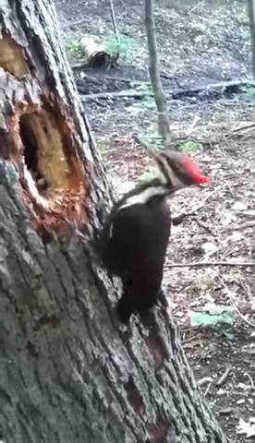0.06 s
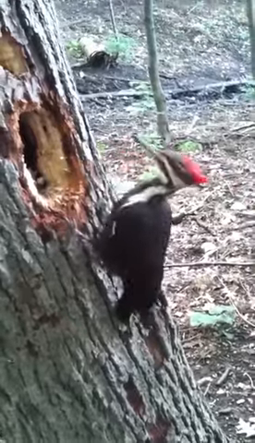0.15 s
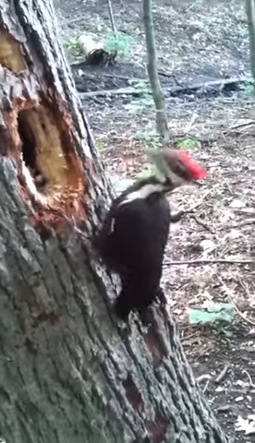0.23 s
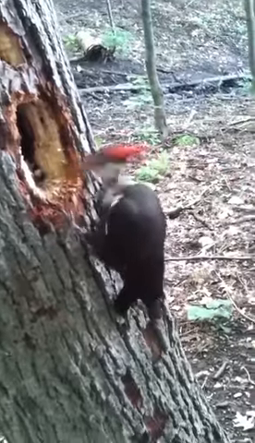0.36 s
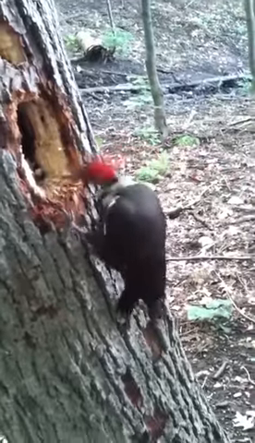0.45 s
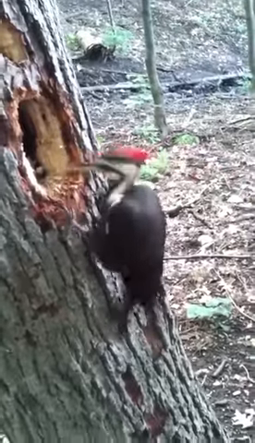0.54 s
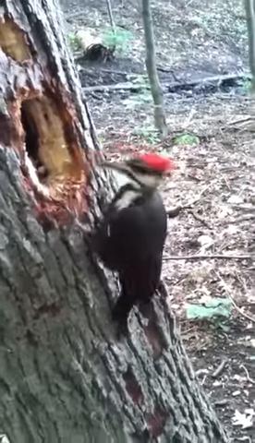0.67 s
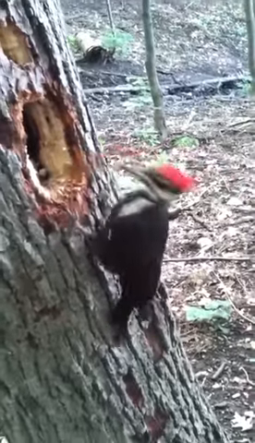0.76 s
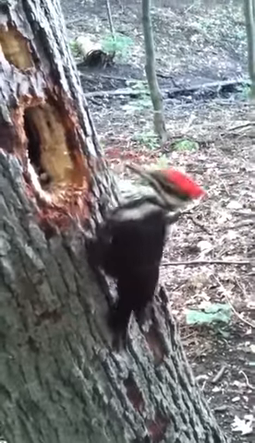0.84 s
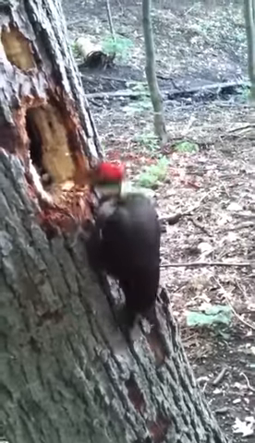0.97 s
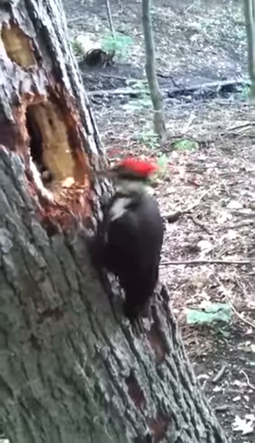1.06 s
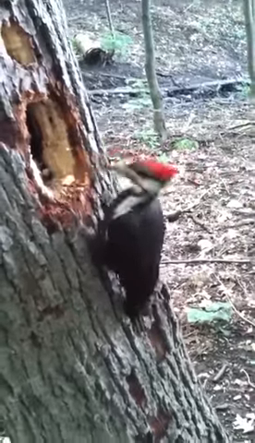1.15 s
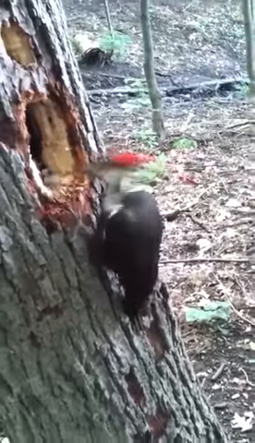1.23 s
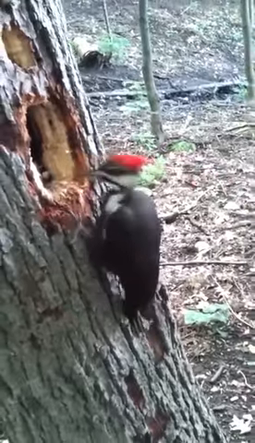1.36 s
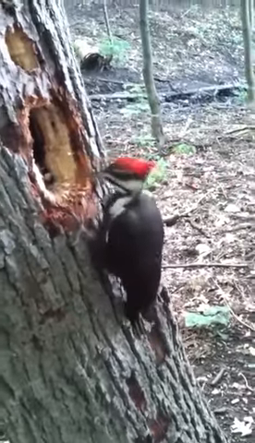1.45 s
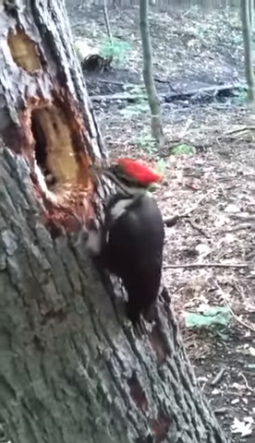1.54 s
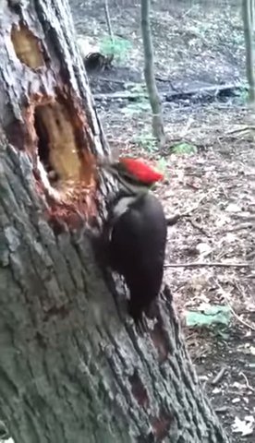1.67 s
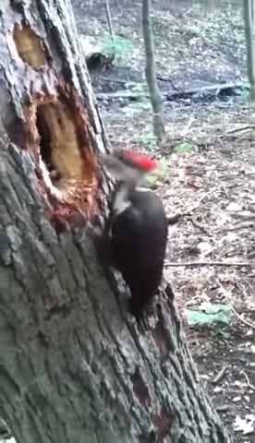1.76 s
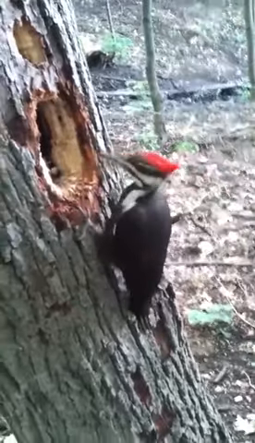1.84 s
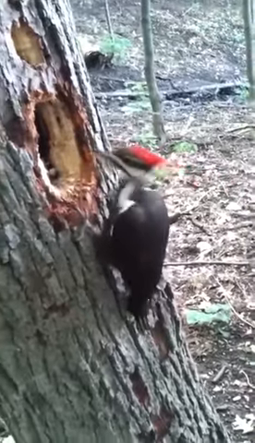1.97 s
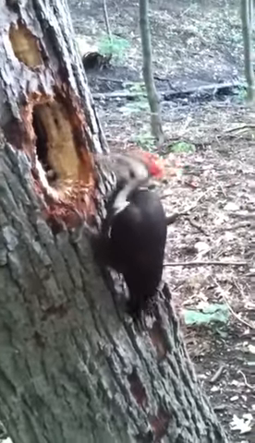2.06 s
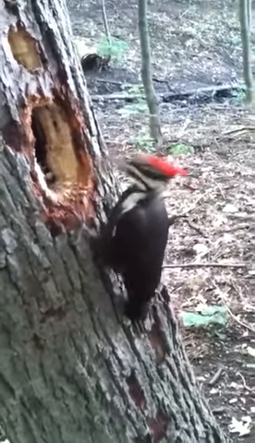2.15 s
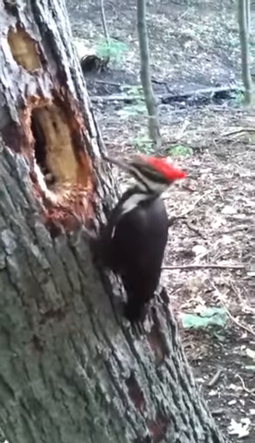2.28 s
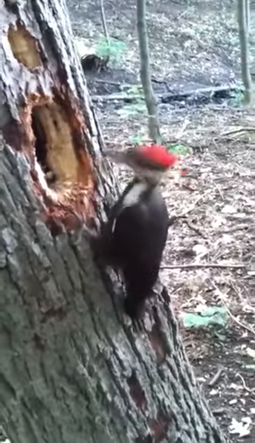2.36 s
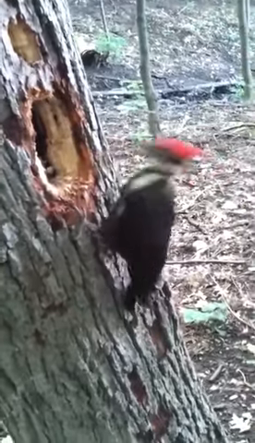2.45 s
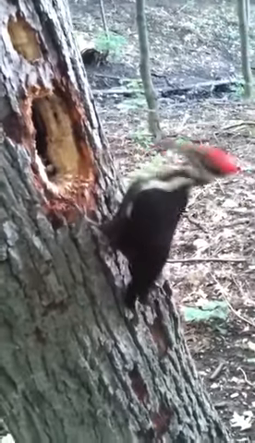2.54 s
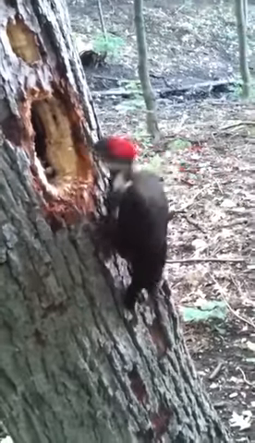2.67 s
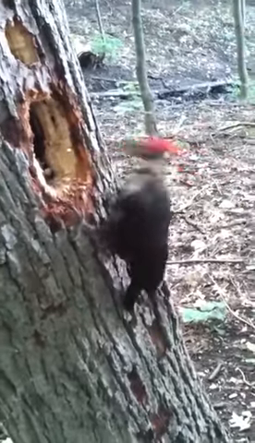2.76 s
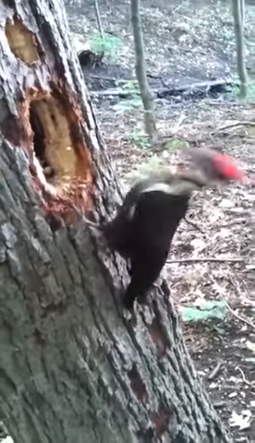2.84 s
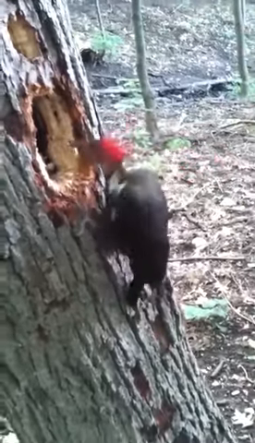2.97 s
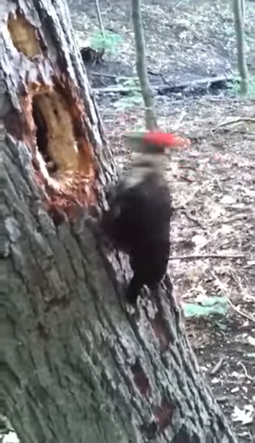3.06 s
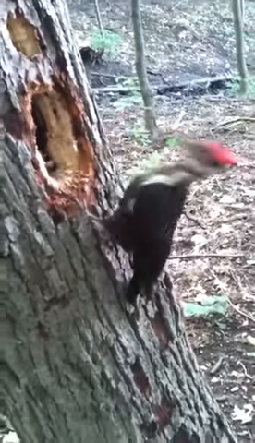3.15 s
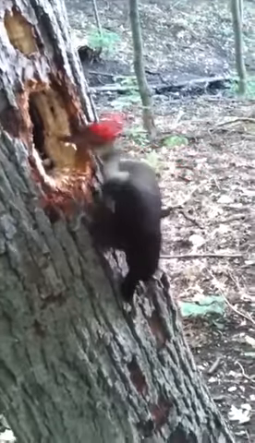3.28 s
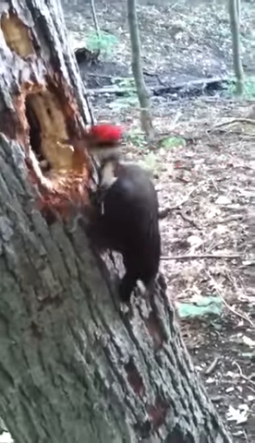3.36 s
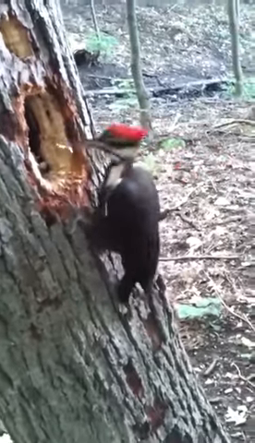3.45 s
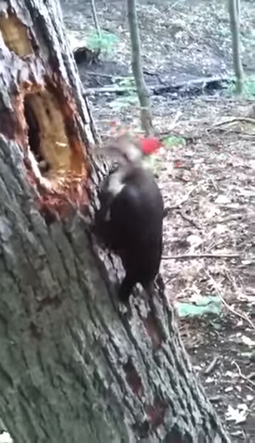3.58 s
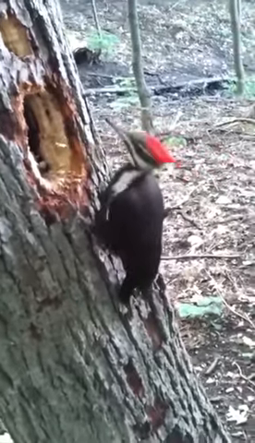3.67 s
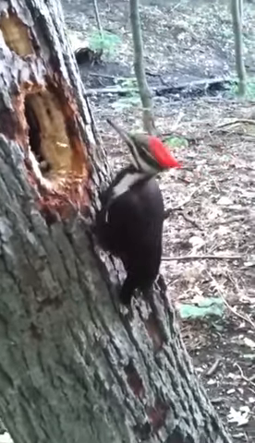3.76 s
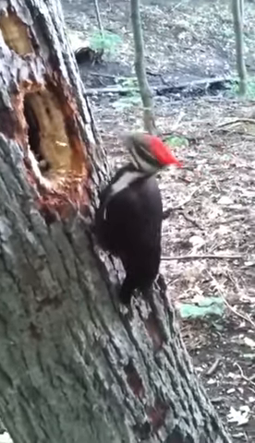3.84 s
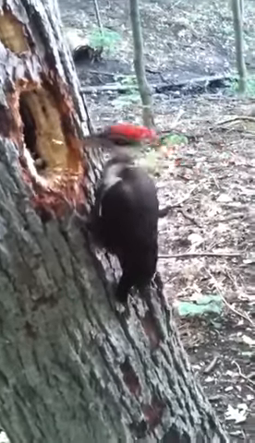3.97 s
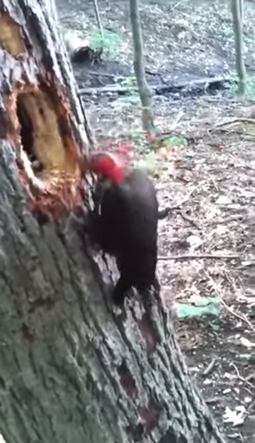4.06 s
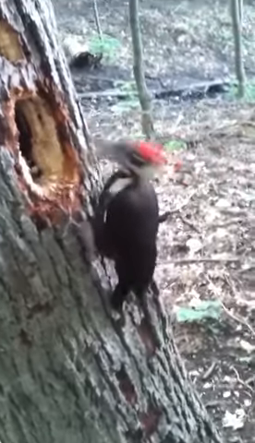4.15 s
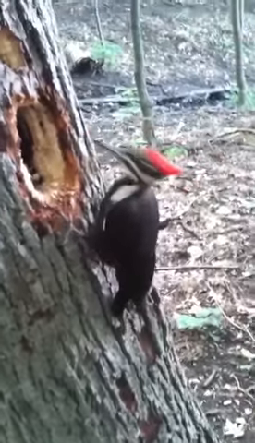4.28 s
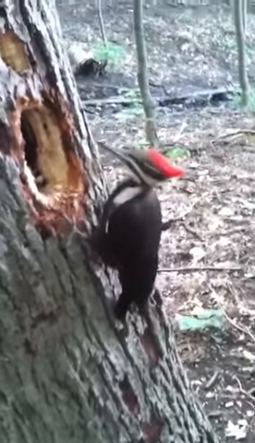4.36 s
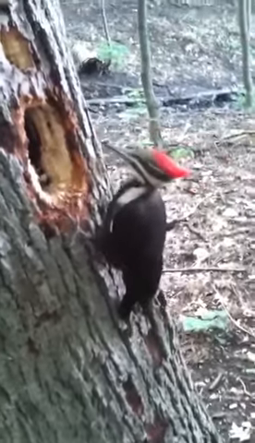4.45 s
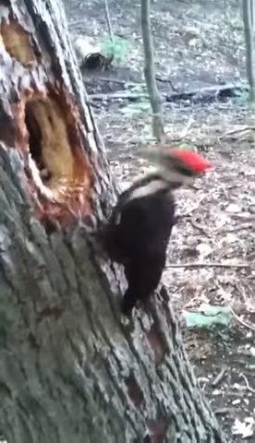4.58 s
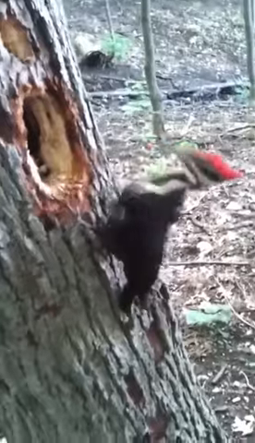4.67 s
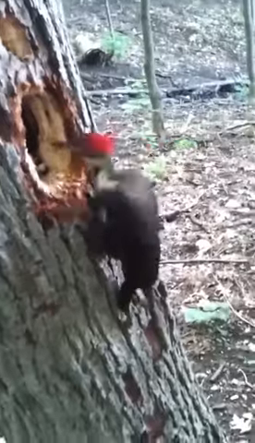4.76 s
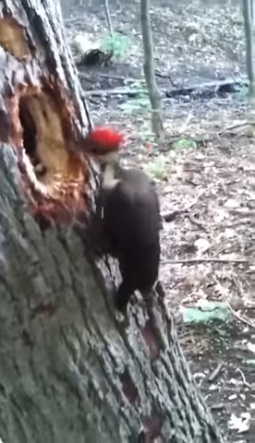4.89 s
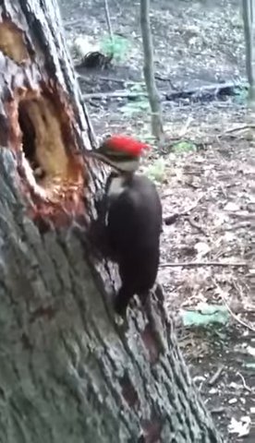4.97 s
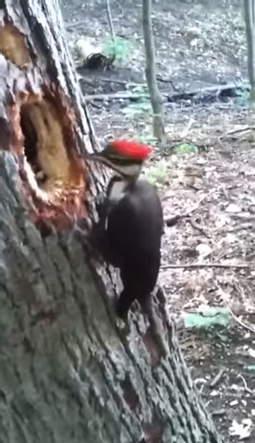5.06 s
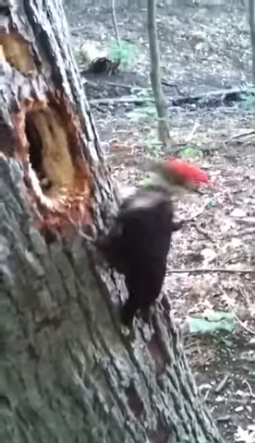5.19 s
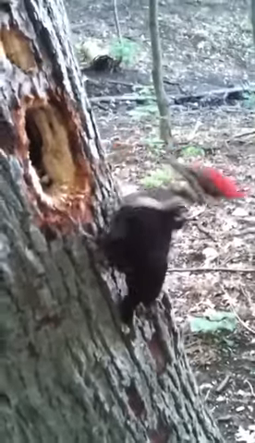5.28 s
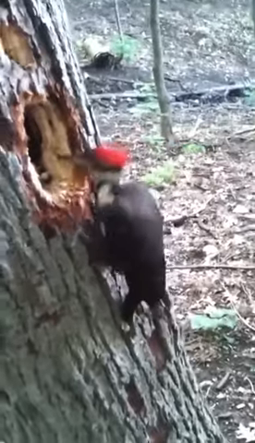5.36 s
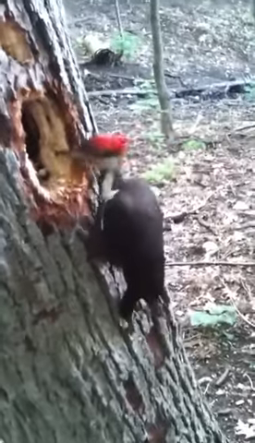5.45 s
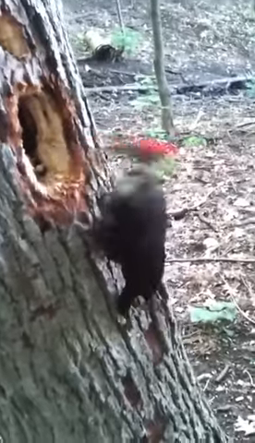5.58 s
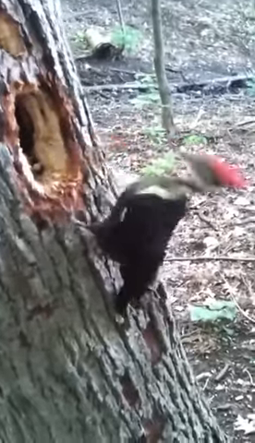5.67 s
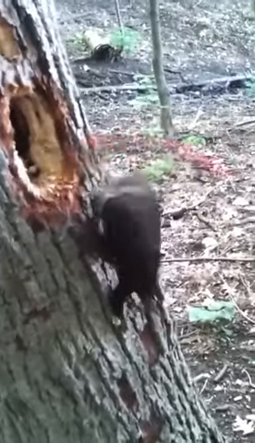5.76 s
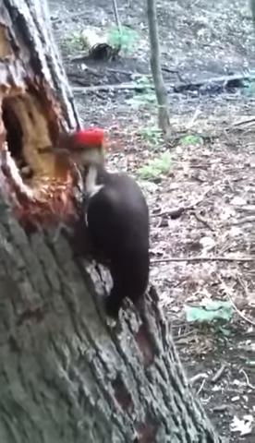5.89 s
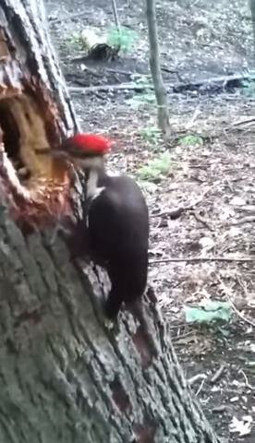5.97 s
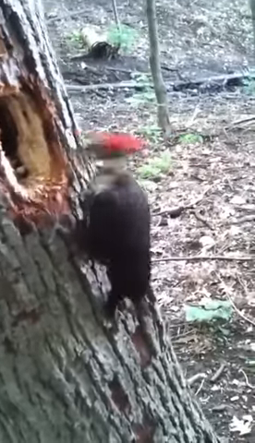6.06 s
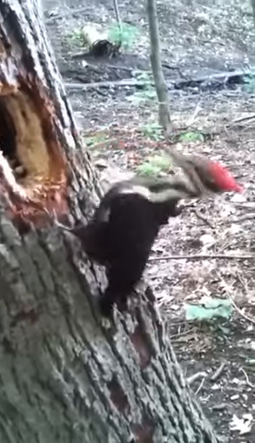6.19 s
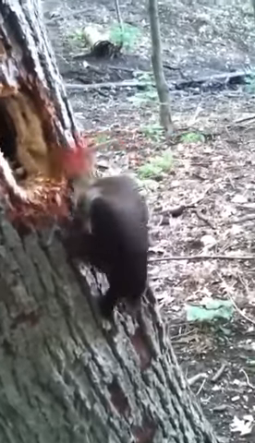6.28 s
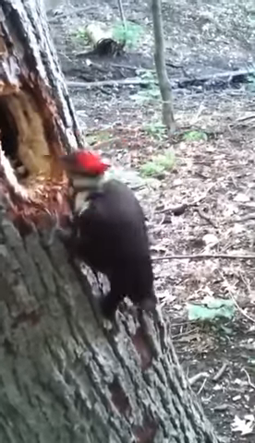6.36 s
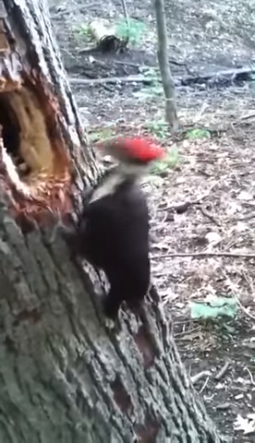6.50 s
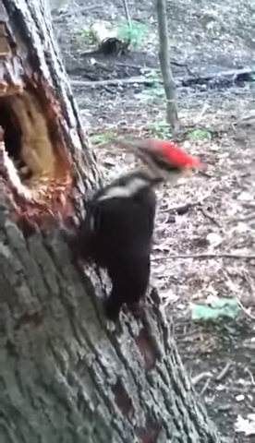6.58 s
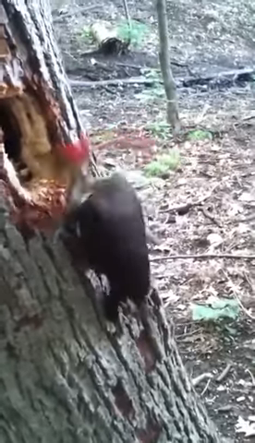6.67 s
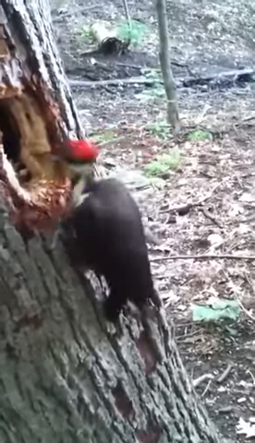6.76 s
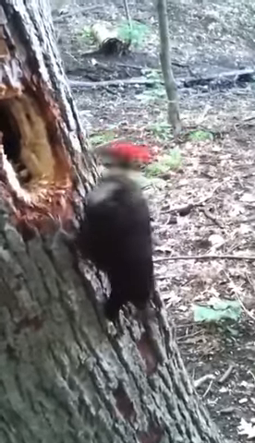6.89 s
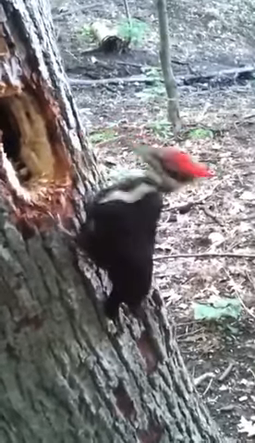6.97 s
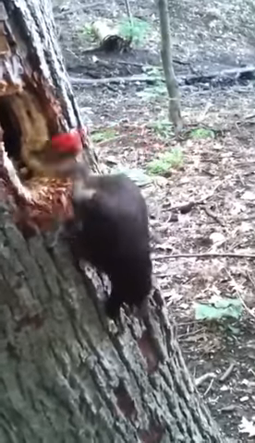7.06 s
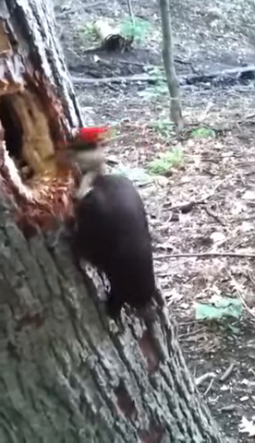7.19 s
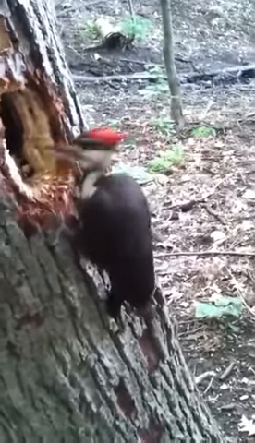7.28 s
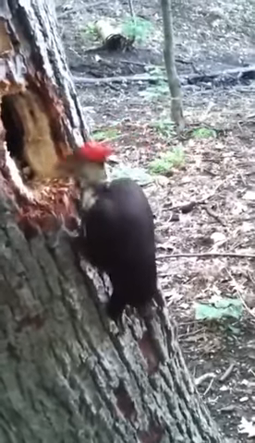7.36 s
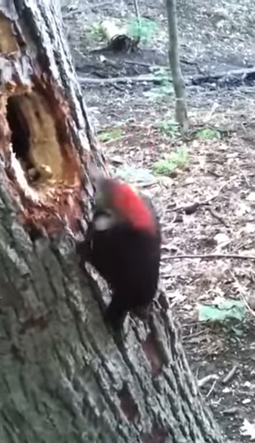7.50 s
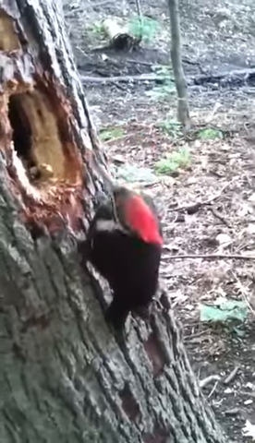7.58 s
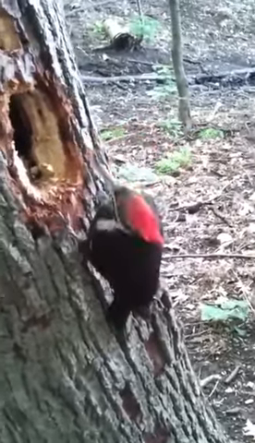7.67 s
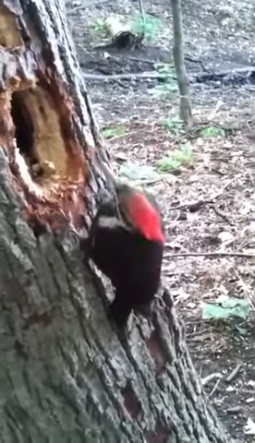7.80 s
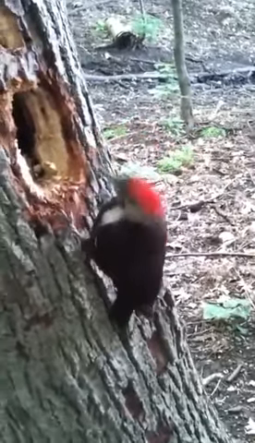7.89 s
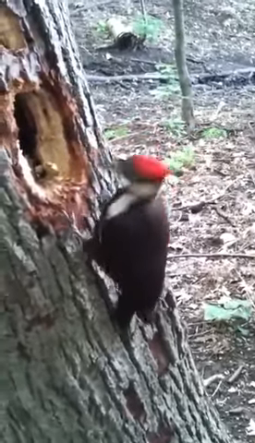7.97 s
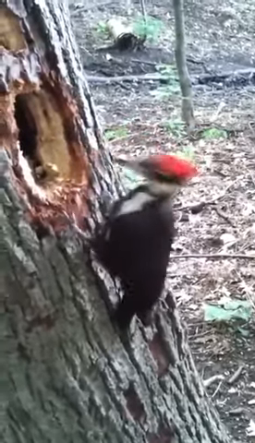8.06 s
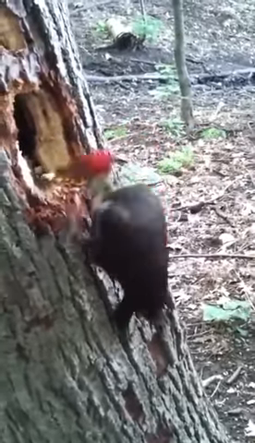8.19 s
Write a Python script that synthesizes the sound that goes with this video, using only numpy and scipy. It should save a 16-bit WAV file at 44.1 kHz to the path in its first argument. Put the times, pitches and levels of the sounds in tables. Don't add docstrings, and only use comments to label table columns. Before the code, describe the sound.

A soft low hum of woodland air and far rumble runs throughout, slowly swelling. Faint wood creaks and light beak taps begin around 0.4 s, with a firmer hollow peck at 1.0 and a light tap at 1.3. From about 1.1 to 2.2 s a distant warbler repeats thin, quick upward-flicked whistles. Hard pecks land at 2.7, 3.0 and 3.3 s, each a beak tick, a short hollow knock and splintering fibres. Around 4.1 s a second bird slurs and trills. Heavy blows follow at 4.8, 5.4, 5.8 and 6.3 s, with bright cracks and a cluster of small rebounds near 5.9. Slightly softer blows come at 6.7 and 7.1, then light taps to the end. High chips become regular after 6 s, about five per second, with more slurs and trills at 6.6-7 and 7.7-8. Birds sound far and echoing; the narrow, nearly mono pickup dulls the treble.

```python
import sys
import numpy as np
from scipy import signal
from scipy.fft import rfft, irfft, next_fast_len
from scipy.io import wavfile
from scipy.ndimage import uniform_filter1d

SR = 44100
rng = np.random.default_rng(int(sys.argv[2]) if len(sys.argv) > 2 else 0)


def store_pcm(level_fs):
    pcm = np.round(np.clip(level_fs, -1, 1) * 32767).astype(np.int16)
    wavfile.write(sys.argv[1], SR, np.atleast_2d(pcm).T)


def voltage_ratio(level):
    return 10 ** (np.asarray(level, float) / 20)


N = 362943


def read(points, hz):
    f, value = np.transpose(points)
    return np.interp(np.log(hz + 1), np.log(f + 1), value)


def evened(x):
    return x / np.sqrt(np.mean(x ** 2) + 1e-20)


def coloured(x, points):
    size = next_fast_len(x.shape[-1])
    gain = voltage_ratio(read(points, np.fft.rfftfreq(size, 1 / SR)))
    return irfft(rfft(x, size) * gain, size)[..., :x.shape[-1]]


def add(mix, s, sound):
    part = mix[round(s * SR):][:len(sound)]
    part += sound[:len(part)]


def trees(x, t60, start):
    taps = np.zeros(SR)
    slots = np.arange(0, SR - 20, 20)
    taps[slots + rng.integers(0, 20, len(slots))] = rng.choice([-1., 1.], len(slots))
    t = np.arange(SR) / SR
    taps *= voltage_ratio(-60 * t / t60) * (1 - np.exp(-t / start))
    return signal.fftconvolve(x, taps / np.linalg.norm(taps))[:N]


# f/Hz, level/dB [dB per Hz]
HUM_SPECTRUM = [(18, -34.5), (30, -37.5), (69, 8.5), (103, 1.5), (274, -9.5), (436, -8.5), (576, -12.5),
                (876, -12.5), (1330, -14.5), (3540, -26.5), (5500, -22.5), (6480, -27.5), (7800, -31.5),
                (10100, -49), (17200, -120)]
# t/s, level/dB
HUM_SWELL = [(0.0, -49), (0.39, -50.5), (1.99, -49.5), (3.51, -47), (5.02, -49), (5.32, -47), (6.69, -44.5),
             (7.75, -50.5), (8.23, -47)]
HUM_DB = -44


def hum():
    frames, hz = N // 256 + 5, np.fft.rfftfreq(1024, 1 / SR)
    real, imaginary, patches = rng.standard_normal((frames, 513, 3)).T
    patches = evened(uniform_filter1d(uniform_filter1d(patches, 14, 0), 16, 1))
    s, swell_db = np.transpose(HUM_SWELL)
    swell_db = np.interp(np.arange(frames) * 256 / SR, s, swell_db - np.mean(swell_db))
    bass_share = 1 / (1 + (hz / 250) ** 2)[:, None] + 0.1
    level_db = read(HUM_SPECTRUM, hz)[:, None] + 1.49 * patches + bass_share * swell_db
    z = (real + 1j * imaginary) * voltage_ratio(level_db)
    return voltage_ratio(HUM_DB) * evened(signal.istft(z, nperseg=1024, noverlap=768)[1][:N])


def whistle(rows, waver):
    s, hz, level_db = np.transpose(rows)
    t = np.arange(s[0], s[-1], 1 / SR)
    shake = evened(uniform_filter1d(rng.standard_normal(len(t)), 150))
    flutter = evened(uniform_filter1d(rng.standard_normal(len(t)), 400))
    turns = np.cumsum(np.interp(t, s, hz) * (1 + waver * shake)) / SR
    edges = np.minimum(np.minimum(t - s[0], s[-1] - t) / 0.0049, 1)
    return voltage_ratio(np.interp(t, s, level_db) + 2.5 * flutter) * edges * np.sin(2 * np.pi * turns)


def bird(notes, waver, wet_db, t60):
    out = np.zeros(N)
    for rows in notes:
        add(out, rows[0][0], whistle(rows, waver))
    return out + voltage_ratio(wet_db) * trees(out, t60, 0.0019)


# t/s, level/dB, top pitch f/Hz
CHIPS = [(0.026, -39.5, 4420), (2.0911, -38.5, 4550), (2.306, -41.5, 4620), (2.4937, -40.5, 4490),
         (2.8828, -37.5, 4600), (4.0277, -44.5, 4710), (4.594, -37.5, 4670), (4.9625, -43.5, 4520),
         (5.16, -45, 4600), (5.328, -48, 4460), (6.0945, -44, 4630), (6.278, -38.5, 4540),
         (6.473, -34.5, 4675), (6.66, -36, 4650), (7.023, -33.5, 4670), (7.226, -34, 4720),
         (7.4067, -35, 4660), (7.6065, -35.5, 4690), (7.783, -37, 4650), (7.9697, -41, 4700),
         (8.1554, -37, 4690)]


def chips():
    low, end = .96, .985
    first = [[(s - .008, low * hz, db - 16.0), (s + .008, hz, db - 9.5), (s + 0.02, end * hz, db - 6.5)]
             for s, db, hz in CHIPS]
    second = [[(s + .045, end * hz, db - 24), (s + .08, end * hz, db - 24)] for s, db, hz in CHIPS]
    return first + second


# f/Hz, level/dB
SPLINTER = [(1000, -6), (2500, -4), (4000, -4), (5700, -1), (7000, -6), (8000, -7.5)]


def crack(db, hz, t60, sharp):
    t = np.arange(round(.25 * SR)) / SR
    noise, grain = rng.standard_normal(len(t)), rng.exponential(1, len(t))
    tick = np.exp(-((t - .0012) / 0.00053) ** 2) * np.sin(2 * np.pi * hz * t)
    bright = coloured(noise, [(1.0 * hz, -30), (0.44 * hz, 0), (1.04 * hz, 0), (1.56 * hz, -30)])
    clumps = uniform_filter1d(grain ** 3.3, 60) ** .5
    fibres = evened((coloured(noise, SPLINTER) + 0.4 * bright) * clumps) * (1 - np.exp(-t / 0.00091))
    fibres *= voltage_ratio(-60 * t / t60) + 0.16 * voltage_ratio(-60 * t / 0.46)
    return voltage_ratio(db) * (1.01 * sharp * tick + 0.44 * fibres)


# t/s, level/dB, brightest
# f/Hz, t60/s
SPLITS = [(0.4179, -32.5, 5670, 0.18), (0.94, -43, 5560, .05), (0.9786, -19.5, 5270, 0.062),
          (2.6775, -18, 5400, 0.041), (2.7151, -31, 5430, 0.096), (2.966, -38, 5650, 0.083),
          (2.9899, -21, 4600, 0.1), (3.0594, -35, 5300, 0.12), (3.316, -30.5, 5150, .095),
          (3.3303, -23.5, 5380, 0.14), (4.061, -37.5, 3960, 0.13), (4.7924, -16.5, 5730, 0.26),
          (5.328, -40.5, 4500, .06), (5.4037, -25.5, 5760, .06), (5.4163, -22.5, 4800, 0.13),
          (5.523, -27, 4000, .08), (5.8288, -9, 5700, 0.054), (6.3096, -10, 6170, 0.089),
          (6.7343, -20.5, 4910, 0.094), (7.0975, -25, 5100, 0.1), (7.1058, -11, 4900, 0.045),
          (7.4754, -36.5, 4660, .1), (7.5088, -28, 5260, .1)]


def splits(out):
    for s, db, hz, t60 in SPLITS:
        add(out, s - .001, crack(db, hz, t60, sharp=0.74))


def ring(t, hz, t60, rise):
    return voltage_ratio(-60 * t / t60) * (1 - np.exp(-t / rise)) * np.sin(2 * np.pi * hz * t)


# f/Hz, level/dB, t60/s
BODY = [(1373, -2, 0.04), (1678, -1, 0.024), (2184, 0.5, 0.029), (2607, 1, 0.017)]
# f/Hz, level/dB, t60/s
DEEP = [
    (425.3, 1, 0.068),
    (157, -3, 0.059),
]


def knock(db, hz, deep_db, body_db, contact_s):
    t = np.arange(round(.2 * SR)) / SR
    spread = rng.uniform(-1, 1, len(BODY))
    swing = (1 - np.exp(-t / 0.0013)) * np.exp(-(t / contact_s) ** 2.7) * np.sin(2 * np.pi * hz * t)
    wall = swing + 0.14 * ring(t, hz * 1.02, 0.038, 0.0011) + 0.23 * ring(t, hz * 1.18, 0.04, 0.0016)
    deep = sum(voltage_ratio(level_db) * ring(t, f, t60, 0.0053) for f, level_db, t60 in DEEP)
    body = sum(voltage_ratio(level_db) * ring(t, f * (1 + 0.052 * u), t60, 0.0017)
               for (f, level_db, t60), u in zip(BODY, spread))
    return voltage_ratio(db + 1.5) * wall + voltage_ratio(deep_db + 5) * deep + voltage_ratio(body_db - 0.5) * body


# t/s, knock level/dB, wood body level/dB, crack level/dB, brightest f/Hz
TAPS = [(0.535, -48, -45, -37, 4320), (0.856, -42.5, -49, -38.5, 4230), (0.967, -38, -50, -39, 6030),
        (1.303, -31, -42, -32, 5670), (1.815, -39.5, -44, -57, 4960), (2.666, -32, -32, -30.5, 5430),
        (3.588, -47, -43, -33, 5460), (4.047, -36, -49, -45, 5000), (4.631, -45, -30, -31, 5600),
        (4.846, -38, -45, -29, 5270), (5.442, -28, -38.5, -11.5, 5300), (5.491, -25, -28, -30.5, 3950),
        (5.875, -27.5, -40, -9, 5500), (5.909, -30, -21, -21, 4020), (5.946, -31.5, -44, -19.5, 3930),
        (5.982, -31, -32, -31, 5820), (6.043, -42, -41, -36, 4900), (6.751, -47, -38, -19, 6230),
        (6.798, -43, -38, -24.5, 4900), (7.354, -39, -49, -39, 5430), (7.499, -41, -34.5, -28, 5630),
        (7.794, -48, -44, -55, 5000), (8.217, -34, -47, -26.5, 4170)]
# crack level/dB, t60/s
TAP_TEAR = [
    (-35, 0.13),
    (-18, 0.1),
    (-15, 0.034),
]


def taps(out):
    for s, db, body_db, crack_db, hz in TAPS:
        deep_db = -33.5 + .4 * db
        tear_s = np.interp(crack_db, *np.transpose(TAP_TEAR))
        add(out, s - .001, knock(db, 810, deep_db, body_db, contact_s=0.0052))
        add(out, s - .002, crack(crack_db, hz, tear_s, sharp=.78))


# t/s, knock level/dB, wall pitch f/Hz, deep ring level/dB, wood body level/dB
BLOWS = [(0.977, -24.5, 890, -44, -26), (0.984, -17.5, 824, -39, -37), (2.677, -30, 815, -28.5, -23.5),
         (2.681, -17, 813, -23, -23), (2.991, -13, 821, -28.5, -19.5), (3.333, -9.5, 775, -25, -19),
         (4.794, -8.5, 810, -25, -23), (5.406, -6.5, 779, -24.5, -18.5), (5.83, -8.5, 830, -22.5, -17),
         (6.311, -11.5, 786, -27.5, -18.5), (6.737, -15.5, 810, -30, -25.5),
         (7.104, -15.5, 810, -33.5, -22.5)]


def blows(out):
    for s, db, hz, deep_db, body_db in BLOWS:
        add(out, s - .001, knock(db, hz, deep_db, body_db, contact_s=0.0048))


def woodpecker():
    out = np.zeros(N)
    splits(out)
    taps(out)
    blows(out)
    return out + voltage_ratio(-20.5) * trees(out, 0.34, 0.0012)


def glides(notes, fade_db):
    return [[(s, first, db), (s + length, last, db + fade_db)] for s, length, first, last, db in notes]


# flick t/s, low f/Hz, top f/Hz, level/dB, low note level/dB
FLICKS = [(1.25, 5280, 6400, -42.5, -64), (1.452, 5100, 6580, -41, -45.5),
          (1.652, 5110, 6560, -38.5, -44.5), (1.85, 4940, 6200, -38.5, -41), (1.525, 4400, 5700, -52, -66),
          (1.68, 4260, 5480, -46.5, -54.5), (1.87, 4290, 5800, -51, -59)]
# start t/s, length t/s, from f/Hz, to f/Hz, level/dB
NOTES = [(1.08, .11, 5170, 5200, -52), (1.14, 0.037, 5800, 5880, -50), (1.92, 0.038, 6200, 6150, -45),
         (1.985, 0.022, 6200, 6150, -47), (2.04, .035, 6200, 6200, -55), (2.08, 0.051, 6630, 5260, -40),
         (2.155, 0.021, 5490, 5710, -44), (3.43, .05, 5570, 5530, -45), (3.61, 0.094, 5540, 5730, -46),
         (3.75, .04, 5750, 5700, -61), (3.83, 0.027, 5590, 5590, -45.5), (3.88, 0.046, 5500, 5580, -61),
         (4.15, 0.068, 6080, 6800, -52.5), (4.37, .04, 6270, 6840, -54), (4.55, 0.079, 6200, 6980, -54),
         (4.95, .03, 6620, 6920, -50), (5.12, .03, 6230, 6540, -53), (5.175, .025, 6450, 5900, -59)]
LOW_HOLD_S, FLICK_S, TOP_HOLD_S = .065, 0.041, .05
LOW_SAG, LOW_FADE_DB, FLICK_FADE_DB, TOP_DB = 0.96, -3, -7.5, -6


def warbler():
    flicks = [[(s - LOW_HOLD_S, low, low_db),
               (s - 0.33 * LOW_HOLD_S, LOW_SAG * low, low_db + LOW_FADE_DB),
               (s, low, low_db + LOW_FADE_DB),
               (s + .25 * FLICK_S, low + .3 * (top - low), db),
               (s + FLICK_S, 0.99 * top, db + FLICK_FADE_DB),
               (s + FLICK_S + TOP_HOLD_S, top, db + TOP_DB)]
              for s, low, top, db, low_db in FLICKS]
    return flicks + glides(NOTES, fade_db=-9.5)


def zigzag(turns):
    return np.arcsin(0.95 * np.cos(2 * np.pi * turns)) / np.arcsin(0.95)


# start t/s, length t/s, middle f/Hz, swing f/Hz, level/dB
SLURS = [(4.078, 0.0505, 3860, 300, -38.5), (4.132, .065, 4850, 496, -33.5), (6.735, .045, 3860, 247, -40),
         (6.787, .09, 4796, 650, -38), (7.736, 0.063, 3950, 300, -47)]
# start t/s, length t/s, middle f/Hz, swings per second f/Hz, level/dB
TRILLS = [(4.208, 0.13, 3280, 18.5, -35), (5.896, 0.21, 3300, 10, -52.5), (6.862, .16, 3180, 23, -39),
          (7.928, .13, 3230, 12, -45)]
# start t/s, length t/s, from f/Hz, to f/Hz, level/dB
RISES = [(4.118, .017, 3770, 4580, -36.5), (6.588, .045, 3490, 5250, -42),
         (6.665, 0.045, 5270, 6100, -52.5), (7.02, 0.044, 2606, 2530, -42), (7.822, .022, 4930, 5000, -48),
         (7.844, .024, 4970, 3770, -43), (7.868, 0.029, 3820, 3750, -46), (7.92, .04, 4140, 4250, -43.5)]
TRILL_SWING_HZ, TRILL_SAG_HZ_PER_S = 389, 1900


def singer():
    u = np.linspace(0, 1, 41)
    notes = []
    for s, length, hz, swing, db in SLURS:
        notes.append(np.transpose([s + length * u, hz + swing * zigzag(u - 1 / 4), db - 7.5 * u]))
    for s, length, hz, rate, db in TRILLS:
        t = length * u
        pitch = hz - TRILL_SAG_HZ_PER_S * t + TRILL_SWING_HZ * zigzag(rate * t)
        notes.append(np.transpose([s + t, pitch, db - 3.5 * u]))
    return notes + glides(RISES, fade_db=0)


def scene():
    birds = bird(chips(), waver=.006, wet_db=-4.5, t60=0.55)
    birds += bird(warbler(), waver=.016, wet_db=2.5, t60=0.78)
    birds += bird(singer(), waver=.022, wet_db=2.25, t60=0.72)
    mid = hum() + woodpecker() + birds
    return np.array([mid, mid])


CLEAN_ATTACKS = [4.793, 5.404, 6.310]
WIDTH_DB, WIDE_FROM_HZ, WIDE_SHARE = -8, 4150, .55


def thin_and_blur(x):
    frame = dict(fs=SR, nperseg=2048, noverlap=1536)
    hz, _, z = signal.stft(x, **frame)
    band = np.arange(len(hz)) // 8
    power = np.add.reduceat(abs(z) ** 2, np.arange(0, len(hz), 8)) / 8
    level_db = 10 * np.log10(power + 1e-20)
    steps = np.arange(len(level_db))
    apart = steps[:, None] - steps[None]
    slope_db = np.where(apart > 0, 0.88 * apart, -2.5 * apart)
    mask_db = (level_db[None] - slope_db[..., None]).max(1) - 16.5
    luck_db = 4.7 * evened(uniform_filter1d(rng.standard_normal(level_db.shape), 4, 1))
    kept = 1 / (1 + np.exp(np.clip(2 * (mask_db + luck_db - level_db), -30, 30)))
    kept = np.where(hz[:, None] > 2200, kept[band], 1)

    a, b, c, d = rng.standard_normal(z.shape[::-1] + (4,)).T
    blur = signal.istft(voltage_ratio(level_db[band] - 8.5) * (a + 1j * b), **frame)[1][:N]
    before_s = np.subtract.outer(CLEAN_ATTACKS, np.arange(N) / SR)
    blur = blur * ~((before_s > 0) & (before_s < .05)).any(0)
    mid = kept * (z + signal.stft(blur, **frame)[2])

    drift = uniform_filter1d(uniform_filter1d(c + 1j * d, 6, 0), 5, 1)
    drift = evened(drift.view(float)).view(complex)
    patches = uniform_filter1d(rng.random((len(hz) // 24 + 1, z.shape[1] // 4 + 1)), 2, 0)
    wide = (patches < np.quantile(patches, WIDE_SHARE)).repeat(24, 0).repeat(4, 1)
    wide = wide[:len(hz), :z.shape[1]] * (hz > WIDE_FROM_HZ)[:, None]
    side = mid * drift * voltage_ratio(WIDTH_DB) * wide
    return signal.istft(np.array([mid + side, mid - side]), **frame)[1][:, :N]


def low_pass(x):
    return signal.sosfilt(signal.butter(12, 8590, fs=SR, output="sos"), x)


def record(dry):
    thin = signal.sosfilt(signal.butter(3, 48, "high", fs=SR, output="sos"), dry[0])
    edge = signal.firwin(401, 7604, window=("kaiser", 7), fs=SR)
    mix = signal.oaconvolve(thin_and_blur(thin), edge[None], "same")
    return low_pass(mix)


dry = scene()
out = record(dry)
store_pcm(out)
```